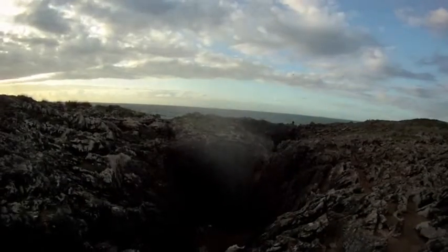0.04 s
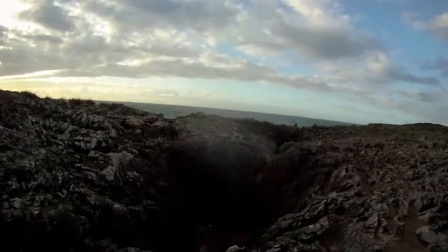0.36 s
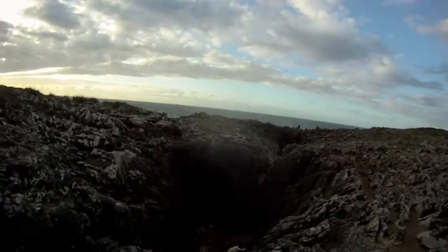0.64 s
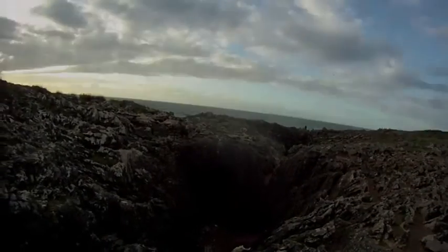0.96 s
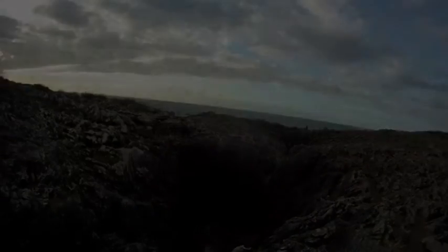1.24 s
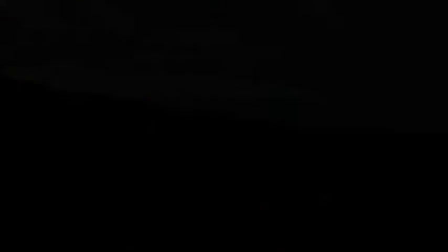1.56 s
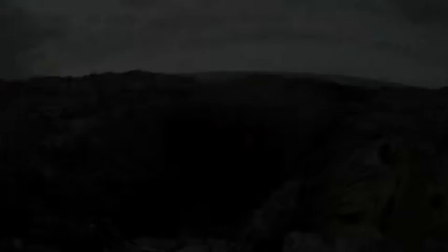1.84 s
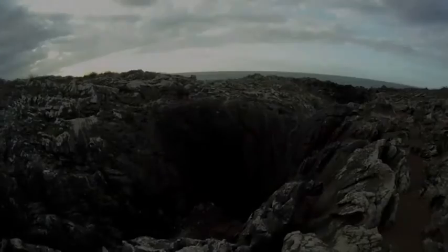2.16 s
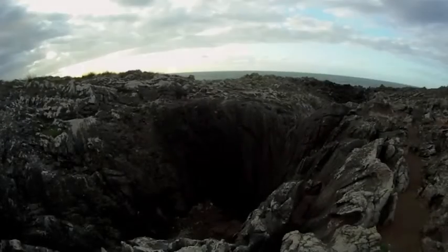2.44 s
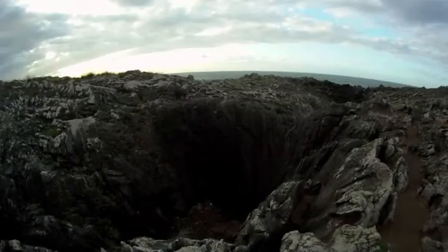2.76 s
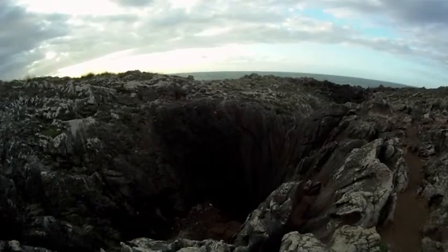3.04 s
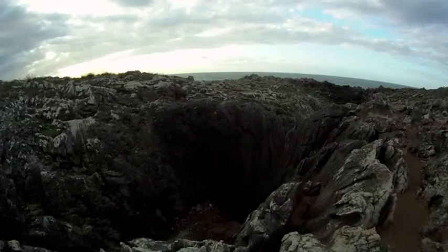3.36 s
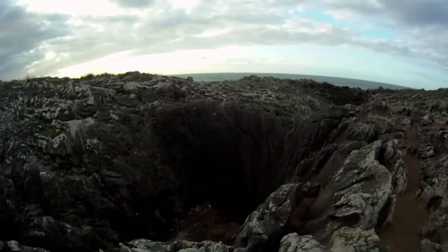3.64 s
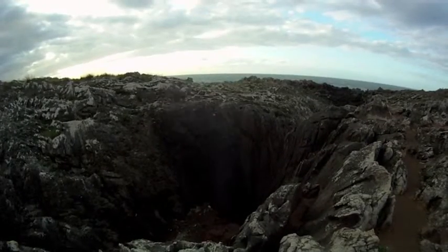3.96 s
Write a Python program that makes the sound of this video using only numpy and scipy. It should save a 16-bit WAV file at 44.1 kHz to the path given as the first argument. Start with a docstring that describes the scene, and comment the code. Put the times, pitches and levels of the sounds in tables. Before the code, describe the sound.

Air and spray roar out of a blowhole on a windy shore and fade out. In the lull, wind buffets the microphone and air whistles faintly through rock, before the roar swells back, lurching sideways in the gusts.

```python
"""Windy rocky coast: a blowhole heard from two spots, joined by a fade through silence.
A surge of turbulent air and spray roars out of the shaft. In the lull, air whistles faintly
through a crack in the rock as the next surge builds. Wind rumbles, thumps and crackles on the
microphone, and the balance lurches sideways in hard gusts. A slow converter adds mirrored treble."""
import sys
import numpy as np
from scipy import signal
from scipy.fft import rfft, irfft
from scipy.io import wavfile
from scipy.ndimage import uniform_filter1d

SR = 44100
rng = np.random.default_rng(int(sys.argv[2]) if len(sys.argv) > 2 else 0)


def generate_wav(sig):
    """Save sig (samples, or channels by samples) to the path in sys.argv[1] as 16-bit PCM at SR."""
    pcm = np.round(np.clip(np.atleast_2d(sig).T, -1, 1) * 32767).astype(np.int16)
    wavfile.write(sys.argv[1], SR, pcm)


N = 176400
T, HZ = np.arange(N) / SR, np.fft.rfftfreq(N, 1 / SR)
SPOT_CHANGE_S = 1.731


def amp(db):
    """Decibels to gain."""
    return 10 ** (np.asarray(db) / 20)


def unit(x):
    """Scale to rms 1."""
    return x / np.sqrt(np.mean(x ** 2) + 1e-20)


def envelope(points):
    """Gain over time from rows of time_s, gain_db."""
    return amp(np.interp(T, *np.transpose(points)))


def tint(x, spectrum, low_cut_hz=16):
    """Shape unit white noise to rows of freq_hz, density_db, with a low cut."""
    freq_hz, density_db = np.transpose(spectrum)
    gain = amp(np.interp(np.log(HZ + 1), np.log(freq_hz), density_db))
    low_cut = HZ ** 2 / (HZ ** 2 + low_cut_hz ** 2)
    return irfft(rfft(x) * gain * low_cut, N) * np.sqrt(SR / 2)


def wander(rate_hz):
    """Random motion of rms 1, low-passed at rate_hz."""
    return unit(irfft(rfft(rng.standard_normal(N)) / np.sqrt(1 + (HZ / rate_hz) ** 6), N))


def rumble(spectrum, evenness, window_s, side_db=-31):
    """Turbulence at two close microphone ports; evenness (0 to 1) flattens its chance swells."""
    mid, side = rng.standard_normal((2, N))
    pressure = tint(mid + amp(side_db) * np.array([side, -side]), spectrum)
    power = uniform_filter1d((unit(pressure) ** 2).mean(0), int(window_s * SR))
    return pressure / (power + 1e-9) ** (evenness / 2)


def wind():
    """Wind on the microphone: continuous rumble plus short, brighter buffets."""
    # Rumble loudness: time_s, gain_db
    loudness = [(0, -2.5), (.2, 1.5), (.45, 0), (.68, -3), (.95, -3.5), (1.3, -3), (1.63, -4.5),
                (1.74, -23.5), (1.94, -14), (2.02, -2.5), (2.14, -15), (2.3, -17), (2.42, -16), (2.54, -8),
                (2.66, -13), (2.85, -5.5), (3.02, -6), (3.25, -3.5), (3.44, 1), (3.46, -8), (3.53, -4.5),
                (3.62, 1.5), (4, 1.5)]
    # Single buffets: centre_s, sigma_s, gain_db
    buffets = [(1.795, .005, -8), (1.853, 0.0093, -0.5), (1.913, 0.0088, -5), (2.0, 0.011, -6.5),
               (2.036, 0.0075, 6.5), (2.061, 0.0048, 9), (2.088, 0.0095, -1), (2.367, 0.011, 0.5),
               (2.413, .011, 5.5), (2.473, 0.012, -5.5), (2.524, .022, -1), (2.784, 0.015, 1),
               (3.097, .02, 3.5), (3.27, 0.041, 1.5), (3.439, .01, 5.5)]
    # Rumble and buffet spectra: freq_hz, density_db
    rumble_spectrum = [(8, -45.5), (28, -30.5), (55, -31.5), (100, -33.5), (150, -41.5), (220, -47),
                       (320, -58), (450, -78.5), (800, -73), (2000, -120)]
    buffet_spectrum = [(10, -45), (45, -32.5), (110, -35), (190, -44), (300, -55), (420, -64), (600, -73),
                       (1000, -92), (3000, -120)]
    pulses = sum(amp(gain_db) * np.exp(-((T - centre_s) / sigma_s) ** 2 / 2)
                 for centre_s, sigma_s, gain_db in buffets)
    bed = rumble(rumble_spectrum, evenness=0.38, window_s=0.017) * envelope(loudness)
    thumps = rumble(buffet_spectrum, evenness=1.0, window_s=0.0258) * pulses
    return bed + thumps


def crackles(half_width_s=0.0015, cutoff_hz=2500):
    """Tiny dull snaps of the microphone under the hardest buffets."""
    # Snaps: centre_s, level_db
    snaps = [(2.036, -37), (2.043, -42), (2.063, -38), (2.092, -49), (2.405, -36.5), (2.412, -41)]
    pulses = sum(amp(level_db) * np.exp(-((T - centre_s) / half_width_s) ** 2)
                 for centre_s, level_db in snaps)
    dull_noise = irfft(rfft(rng.standard_normal(N)) / (1 + 1j * HZ / cutoff_hz), N)
    return pulses * unit(dull_noise)


def whistle(centre_s=2.91, half_width_s=0.2, pitch_hz=2040, level_db=-49):
    """Air squeezing through a crack in the rock, pitch and level wavering."""
    waver_rate_hz, waver_depth_hz, waver_db = 58.8, 28, 3.5
    freq_hz = pitch_hz + waver_depth_hz * wander(waver_rate_hz)
    tone = np.sin(2 * np.pi * np.cumsum(freq_hz) / SR)
    tone = unit(tone * amp(waver_db * wander(waver_rate_hz)))
    return amp(level_db) * tone * np.exp(-((T - centre_s) / half_width_s) ** 4)


def surge(loudness, spectrum):
    """Rushing air with eddies in each octave, plus spray drops, all fluttering together."""
    eddy_db, flutter_db = 0.5, 0.82
    drops_per_s, spray_db, drop_spread_db = 1500, -19, 1.5
    air = rfft(rng.standard_normal(N))
    octave = np.log2(np.clip(HZ, 125, 8000) / 125)
    bands = (irfft(air * np.maximum(1 - abs(octave - k), 0), N) for k in range(7))
    eddies = sum(band * amp(eddy_db * wander(rate_hz=35)) for band in bands)
    drop_sizes = amp(drop_spread_db * np.minimum(rng.exponential(1, N), 5))
    polarity = rng.choice([-1, 1], N)
    hits = rng.random(N) < drops_per_s / SR
    spray = np.diff(drop_sizes * polarity * hits, prepend=0)
    flutter = amp(flutter_db * wander(rate_hz=140))
    jet = (unit(eddies) + amp(spray_db) * unit(spray)) * flutter
    return tint(unit(jet), spectrum) * envelope(loudness)


def blowhole():
    """Air and spray roaring out of the shaft, one surge at each spot."""
    # Surge loudness, ducked briefly by the recorder's limiter when gusts hit: time_s, gain_db
    first_loudness = [(0, -2), (.07, -1), (.12, -4.5), (.2, 1), (.245, -4.5), (.32, 0), (.4, 1), (.44, -1),
                      (.5, 2), (.535, -2), (.62, 1), (.95, 1), (1.2, -0.5), (1.36, -1), (1.375, -3.5),
                      (1.55, 0.5), (1.73, -5.5)]
    second_loudness = [(1.73, -31), (2.2, -26), (2.45, -27), (2.6, -23), (2.72, -19.5), (3.04, -13.5),
                       (3.1, -14.5), (3.135, -17), (3.23, -6), (3.32, -3), (3.425, 2), (3.46, -15),
                       (3.5, -8.5), (3.56, -1.5), (3.62, 2), (3.67, -3.5), (3.75, 2), (3.82, -0.5),
                       (3.87, 2), (3.92, -2), (3.97, 3.5), (4, -2)]
    # Surge spectra: freq_hz, density_db
    first_spectrum = [(20, -66.5), (70, -39.5), (93, -35.5), (125, -41.5), (175, -41), (250, -41),
                      (340, -42.5), (440, -41), (600, -48), (800, -51), (880, -50), (918, -47),
                      (970, -51.5), (1500, -56), (1930, -57.5), (2130, -61), (3000, -61.5), (3850, -63),
                      (4300, -69.5), (5200, -70)]
    second_spectrum = [(20, -46), (70, -49), (105, -31.5), (165, -49), (240, -46), (350, -45.5),
                       (440, -50.5), (560, -48), (720, -55), (950, -54), (1330, -58.5), (1530, -58),
                       (2200, -65), (2800, -65), (4000, -66), (5200, -70.5)]
    first = surge(first_loudness, first_spectrum)
    second = surge(second_loudness, second_spectrum)
    return np.where(T < SPOT_CHANGE_S, first, second)


def lurch(x, attack_s=0.0039, release_s=0.015):
    """Balance tips to one side in hard gusts: quick in, slower back."""
    # Lurches: start_s, hold_s, left_minus_right_db
    lurches = [(0.217, 0.075, 3), (0.41, 0.089, -2), (.505, 0.061, 4.5), (1.032, .03, 1),
               (2.033, 0.027, 6.5), (2.07, 0.056, -10), (2.133, 0.042, 8), (2.396, .002, 11),
               (2.406, 0.041, -12), (2.465, .075, 3.5), (3.093, 0.015, -14), (3.118, 0.066, -4),
               (3.382, 0.041, 2), (3.433, 0.017, 16), (3.66, 0.039, 1.2)]
    balance_db = np.zeros(N)
    for start_s, hold_s, lean_db in lurches:
        corners_s = np.cumsum([start_s, attack_s, hold_s, release_s])
        balance_db += np.interp(T, corners_s, [0, lean_db, lean_db, 0])
    left = 2 / (1 + amp(-balance_db))
    return x * np.array([left, 2 - left])


def sample_and_hold(x, hold_hz=12000, output_hz=48000, cutoff_hz=5390, order=17.8):
    """A slow converter holds each sample: the top treble mirrors the band below."""
    band = rfft(x) / np.sqrt(1 + (HZ / cutoff_hz) ** (2 * order))
    held = irfft(band, N)
    base_hz = np.minimum(HZ, hold_hz / 2)
    for shift_hz in (-hold_hz, hold_hz):
        gain = np.sin(np.pi * base_hz / output_hz) / np.sin(np.pi * (base_hz + shift_hz) / output_hz)
        analytic = signal.hilbert(irfft(band * gain, N))
        held += (analytic * np.exp(2j * np.pi * shift_hz * T)).real
    return held


def scene():
    """Blowhole and whistle under the wind, in stereo."""
    return blowhole() + whistle() + wind() + crackles()


def record(dry):
    """Lurching balance, fade between spots, soft overload, slow converter, band limit."""
    fade_out_s, fade_in_s = 0.72, 0.92
    knee, ceiling, cutoff_hz = 0.7, 0.95, 15360
    fade = np.maximum((SPOT_CHANGE_S - T) / fade_out_s, (T - SPOT_CHANGE_S) / fade_in_s)
    x = lurch(dry) * np.minimum(fade, 1)
    linear = np.clip(x, -knee, knee)
    x = linear + (ceiling - knee) * np.tanh((x - linear) / (ceiling - knee))
    lowpass = signal.firwin(1201, cutoff_hz, window=("kaiser", 9), fs=SR)
    return signal.oaconvolve(sample_and_hold(x), lowpass[None], "same")


dry = scene()
out = record(dry)
generate_wav(out)
```